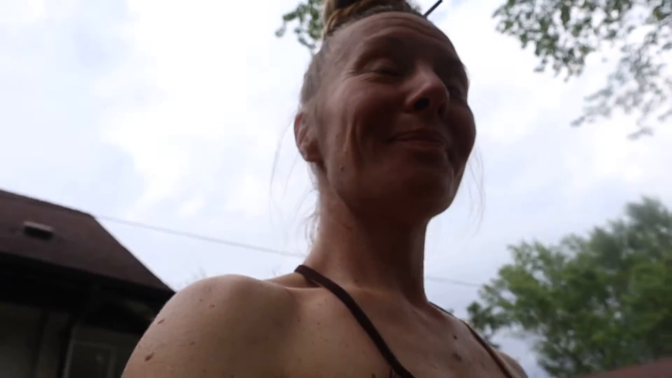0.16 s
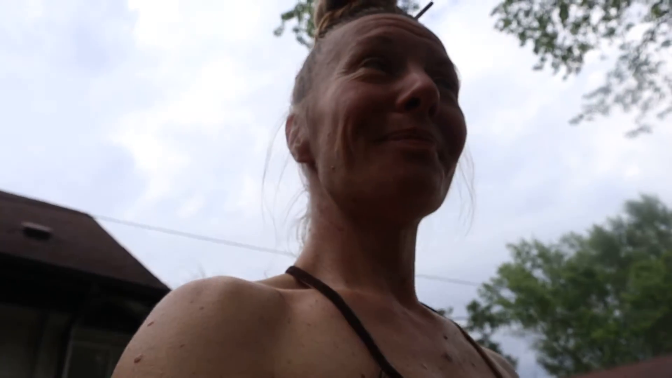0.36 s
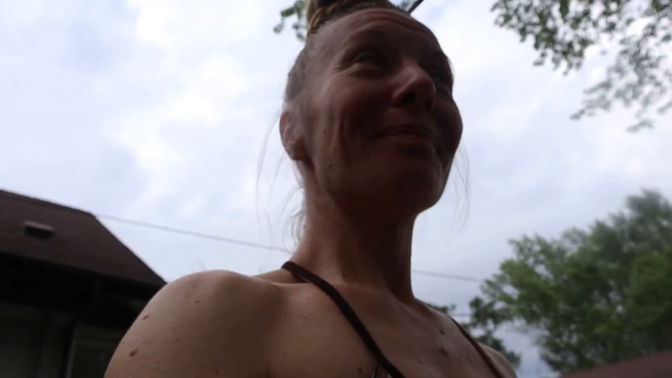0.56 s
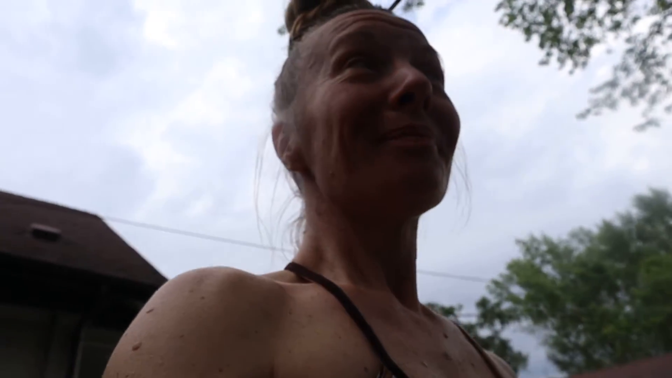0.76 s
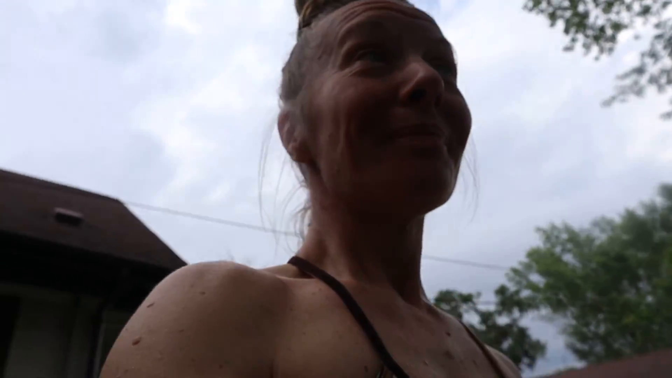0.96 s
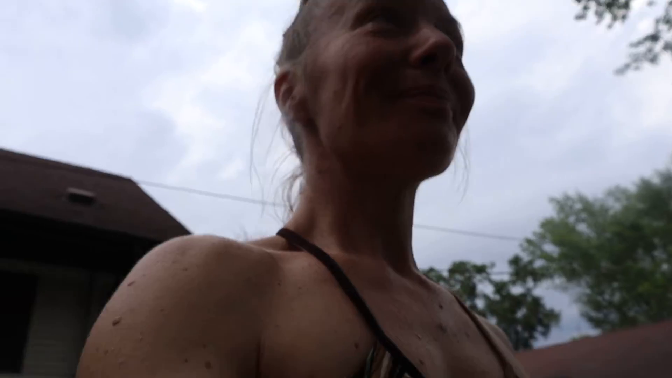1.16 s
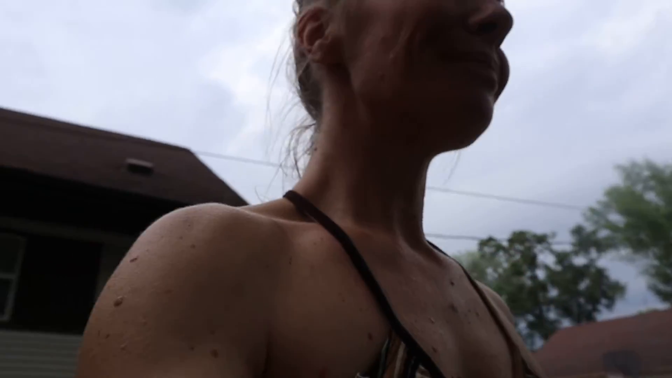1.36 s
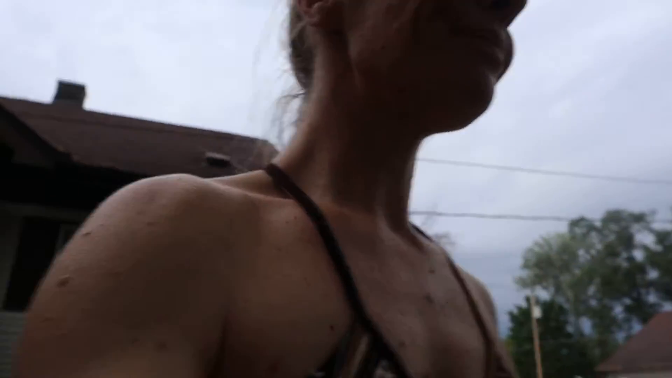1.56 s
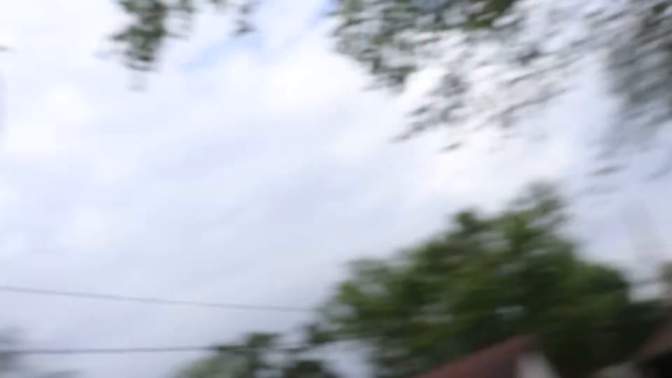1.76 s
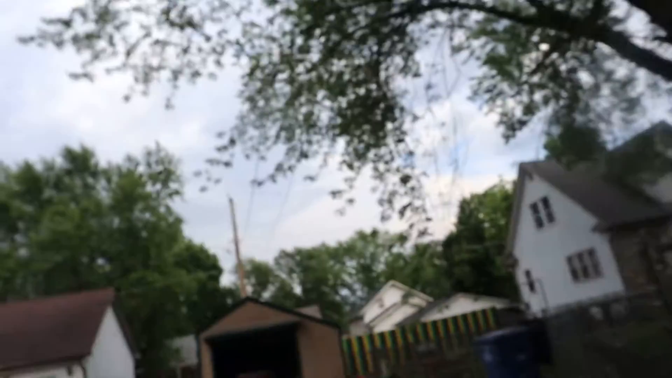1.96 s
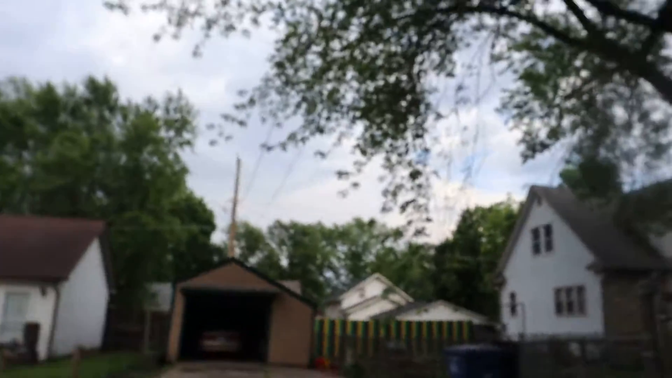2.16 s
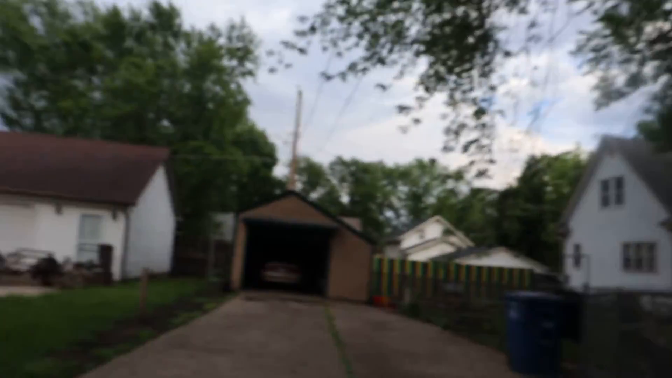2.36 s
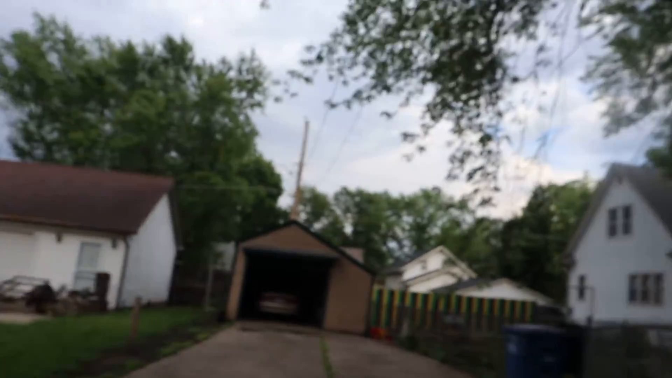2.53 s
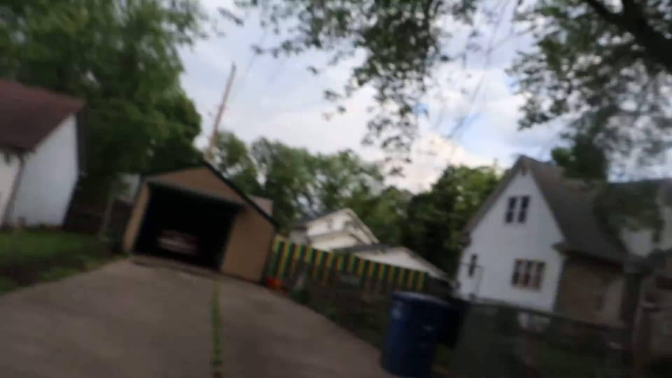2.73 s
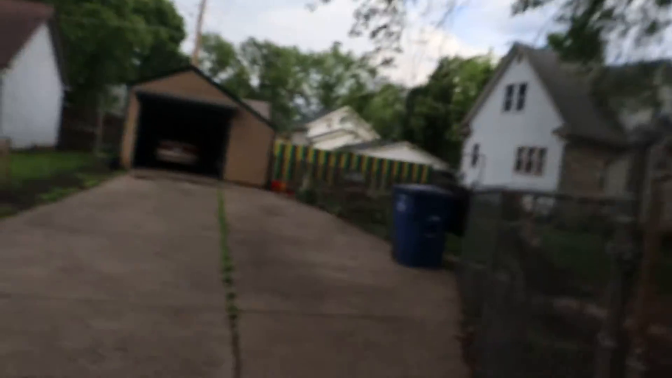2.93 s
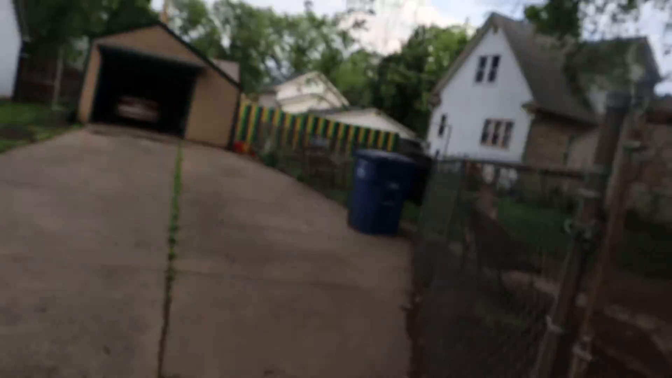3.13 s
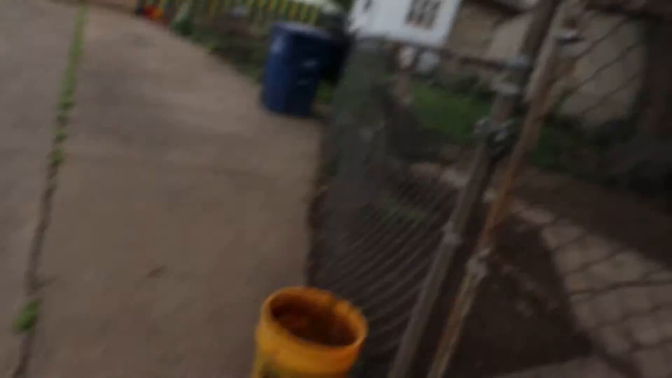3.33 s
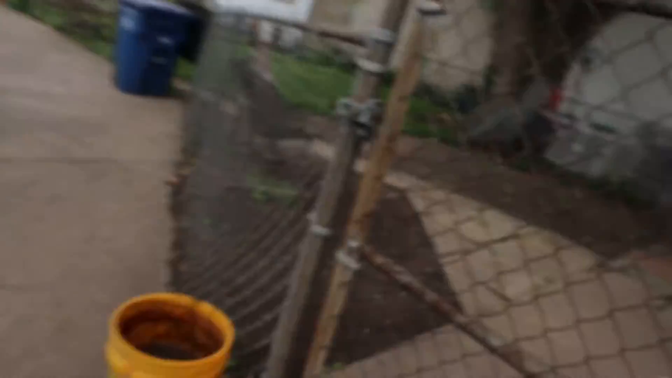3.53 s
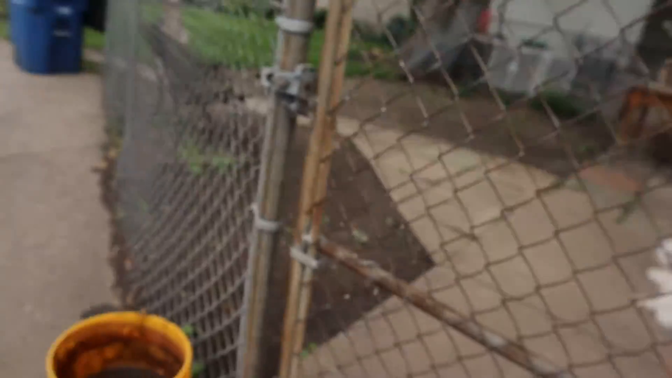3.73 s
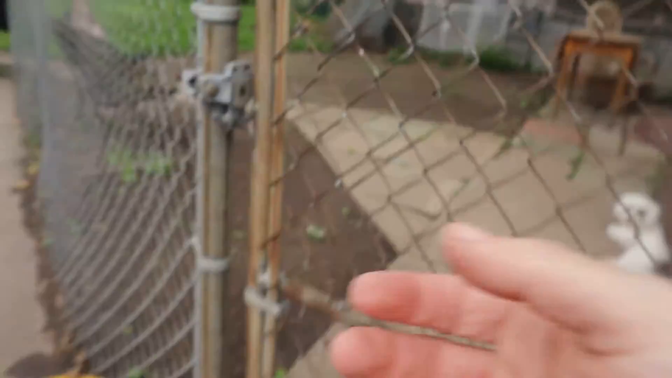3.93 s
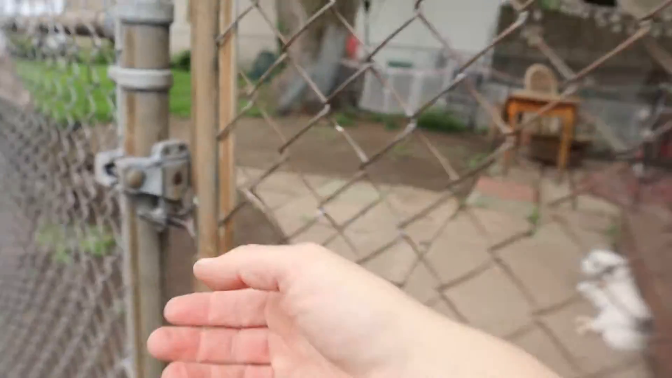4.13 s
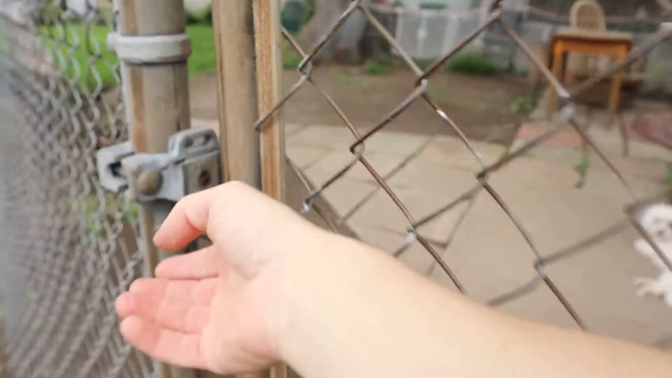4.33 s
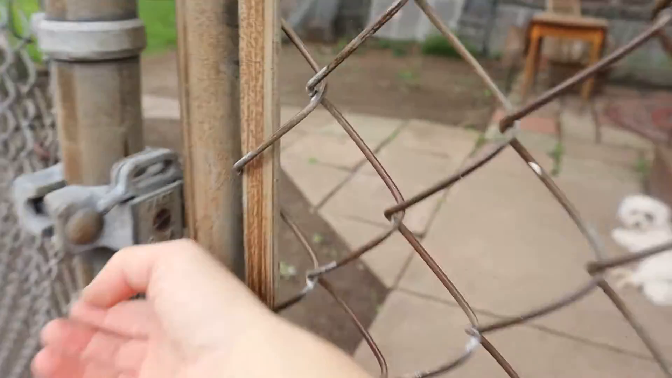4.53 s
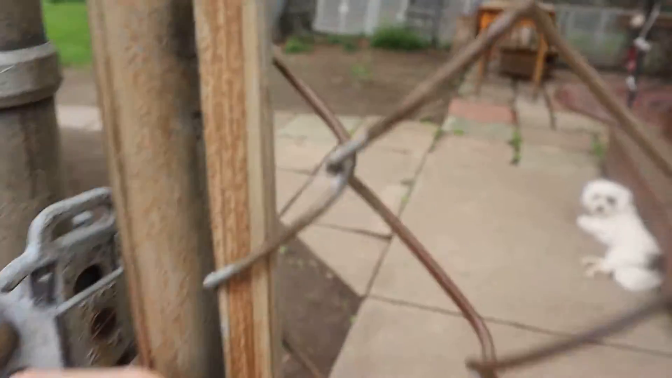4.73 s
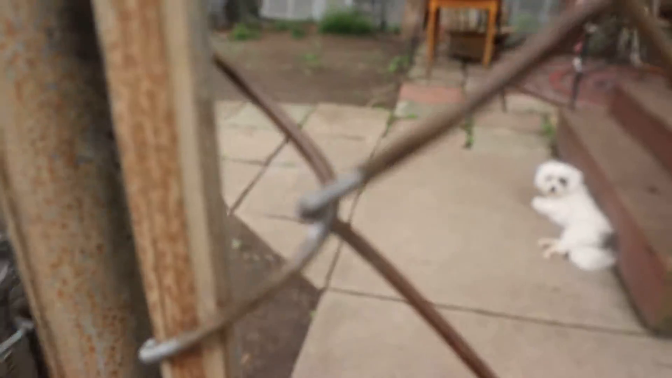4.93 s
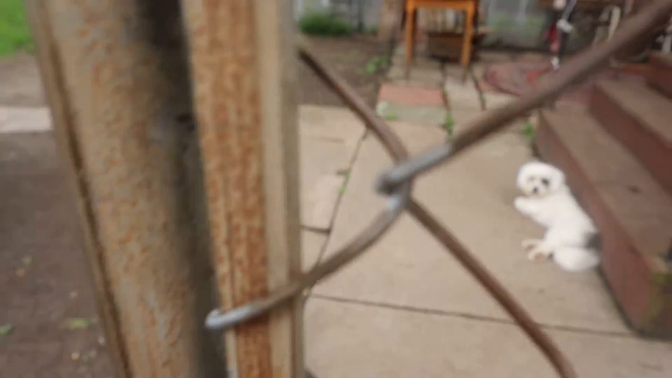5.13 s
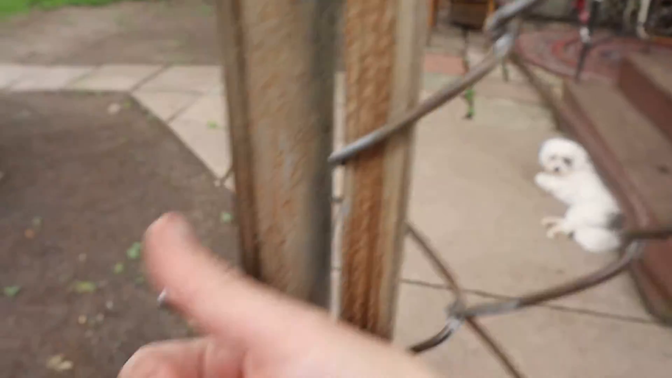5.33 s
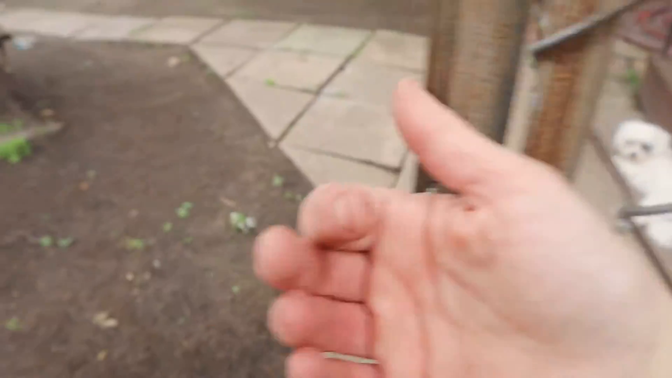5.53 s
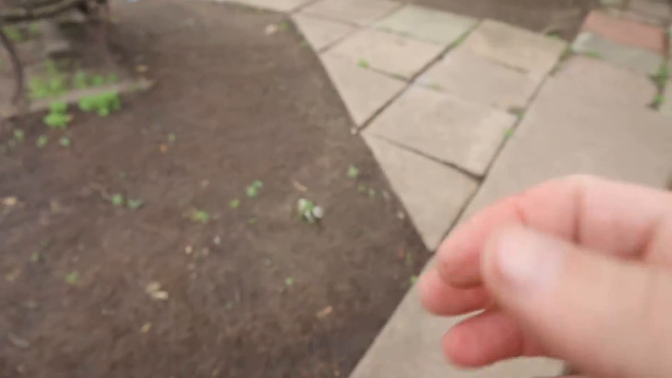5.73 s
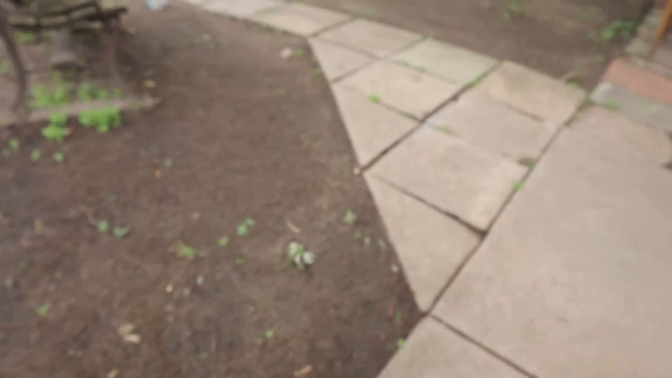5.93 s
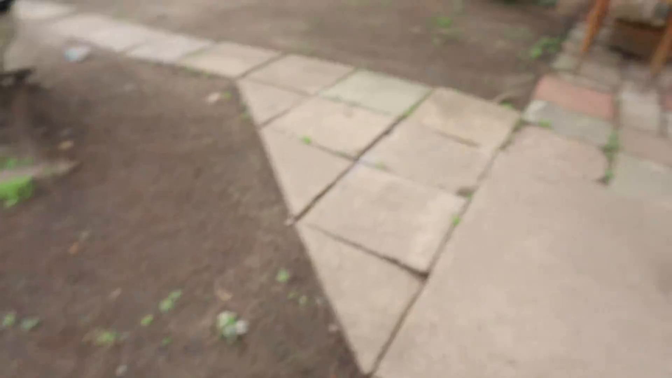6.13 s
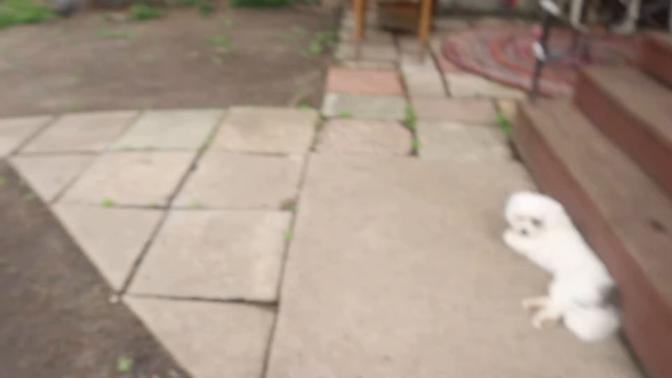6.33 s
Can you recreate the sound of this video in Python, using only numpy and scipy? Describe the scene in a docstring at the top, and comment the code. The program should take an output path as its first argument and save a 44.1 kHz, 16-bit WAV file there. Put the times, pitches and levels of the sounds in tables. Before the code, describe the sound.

Fingers rub and tick on a hand-held microphone, then a chain-link gate's metal latch clacks and rattles, with birds and distant traffic behind.

```python
"""Gate latch in a suburban yard

Close to a hand-held stereo camera, a little left, a chain-link gate's steel fork latch is lifted,
clacks over and drops back, rattling the mesh. Fingers tick, slide and squeak on the housing.
Birds call over distant traffic and leaves, and gusts touch the microphone ports.
The camera pulls its gain down after loud blows and clips their peaks."""
import sys
import numpy as np
from scipy import signal
from scipy.fft import rfft, irfft, next_fast_len
from scipy.io import wavfile
from scipy.ndimage import uniform_filter1d, minimum_filter1d, map_coordinates

SR = 44100
rng = np.random.default_rng(int(sys.argv[2]) if len(sys.argv) > 2 else 0)


def digitize_waveform(pressure):
    """Quantize a signal to 16-bit integers and store it at the path in sys.argv[1].

    Rows of a 2-D input are taken as channels; values are limited to [-1, 1].
    """
    field = np.atleast_2d(pressure).T
    bounded = np.clip(field, -1, 1)
    quanta = np.round(bounded * 32767).astype(np.int16)
    wavfile.write(sys.argv[1], SR, quanta)


N = 285766
T = np.arange(N) / SR

# the yard's background: (time [s], traffic level [dB], leaf level [dB])
BACKGROUND_LEVELS = [(0.0, -34.5, -48.5), (3.52, -34, -44), (6.48, -33.5, -45.5)]
# far traffic and leaves: (frequency [Hz], level [dB])
TRAFFIC_SPECTRUM = [(18, -28), (30, -3.5), (97, -1.5), (158, -5.5), (185, -9), (313, -14), (700, -24.5),
                    (910, -77), (1540, -120)]
LEAF_SPECTRUM = [(290, -14), (500, -18), (742, -2), (1550, -6.5), (2370, -8.5), (3190, -12.5), (10700, -39),
                 (13000, -60)]
# their stereo width: (frequency [Hz], side over mid [dB])
BACKGROUND_WIDTH = [(25, -42), (130, -25), (290, -15), (640, -8), (1410, -5.5), (3100, -2.5), (6820, 5),
                    (15000, 12)]
# a bird's falling double chips: (time [s], length [s], starting pitch [Hz], level [dB])
BIRD_CHIPS = [(0.017, .027, 5070, -54.5), (0.109, 0.015, 4600, -54), (0.159, 0.018, 4700, -56),
              (0.216, .02, 4700, -62), (0.324, 0.016, 4450, -57), (0.824, 0.02, 5700, -60)]
# birds farther off: (time [s], top pitch [Hz], closing pitch over top [ratio], level [dB])
FAR_NOTES = [(0.427, 3950, 0.74, -52), (0.445, 3360, 0.66, -55), (0.572, 3940, 0.85, -51),
             (0.591, 3320, 0.93, -54), (1.655, 4080, 0.71, -51), (1.785, 4050, 0.78, -49),
             (3.576, 3800, 0.69, -47), (3.746, 3890, 0.65, -47), (4.376, 3900, 0.6, -48),
             (4.484, 2660, 0.97, -45.5), (5.53, 3830, 0.85, -47.5), (6.218, 3850, 0.9, -47.5)]
# a near bird with two voices:
# (time [s], low voice level [dB], arching voice against it [dB], pitch [ratio], arch length [s])
NEAR_CALLS = [(1.659, -40.5, -0.5, 0.95, 0.055), (1.857, -39.5, -6, 0.96, 0.071),
              (2.051, -37, -5.5, 1.03, 0.057), (2.262, -38, -7, 0.98, 0.064), (2.493, -39, -6, 0.97, 0.05),
              (5.854, -41, -6.5, .99, .06), (6.066, -38.5, -10.5, 0.98, 0.092), (6.3, -42, -5, 1.01, 0.096)]
# a short peep, a thin whistle and a soft coo: (time [s], length [s], pitches [Hz], level [dB])
BIRD_PEEP = (0, .035, [5050, 5050], -52)
BIRD_WHISTLE = (.47, 0.43, [8750, 9250, 9300, 8700, 7200], -69)
BIRD_COO = (1.72, .36, [345, 347, 343], -46)
# wind on the ports: (time [s], level [dB])
GUST_LEVELS = [(1.45, -63), (1.62, -51), (2.3, -56), (2.9, -53), (3.35, -58), (4.45, -58), (5.9, -62),
               (6.1, -55), (6.48, -61)]
# its low buffeting: (frequency [Hz], level [dB])
GUST_SPECTRUM = [(15, -18), (60, -16), (130, 17.5), (400, -18.5)]
# ticks in the housing: (time [s], level [dB], pitch [Hz], knock against that level [dB])
HOUSING_TICKS = [(1.782, -27.5, 1500, -16), (1.887, -20.5, 1840, -7.5), (1.998, -24.5, 1420, 1.5),
                 (2.598, -23, 6270, -24), (2.626, -21.5, 5230, -20), (2.648, -17.5, 3880, -13),
                 (2.6585, -28, 2300, -3), (3.207, -17.5, 1600, -19), (3.312, -18.5, 1120, -5),
                 (3.38, -21, 1490, -13), (3.813, -17.5, 1610, -0.5), (3.918, -21, 2350, -17),
                 (4.127, -31, 2300, 5), (4.142, -26, 1920, -2), (4.168, -21.5, 1450, -9),
                 (4.307, -21.5, 1180, 4), (4.586, -27.5, 1530, 4.5), (5.895, -29, 1720, -13),
                 (5.802, -29.5, 3500, -13), (6.307, -21, 3280, -3), (6.318, -25, 2480, -12)]
# fingers on the housing: (time [s], length [s], hollow level [dB], rub level [dB], hiss level [dB])
FINGER_SLIDES = [(1.985, 0.074, -54, -51.5, -68), (2.348, 0.16, -47.5, -74, -59.5),
                 (2.654, 0.076, -33, -33, -34), (2.704, 0.13, -39, -51.5, -59),
                 (2.796, 0.11, -36, -42, -48), (2.918, 0.15, -42, -47.5, -46.5),
                 (3.041, 0.061, -36.5, -46.5, -47), (3.098, 0.12, -46, -58, -55),
                 (3.218, 0.12, -44, -48.5, -54.5), (3.358, 0.16, -43.5, -55, -63),
                 (3.482, 0.088, -43.5, -53, -57.5), (3.568, 0.09, -45, -49.5, -57.5),
                 (3.72, 0.095, -44.5, -52, -57), (3.826, 0.14, -45, -51, -54), (4.12, 0.061, -45, -71, -63),
                 (4.58, 0.043, -34, -38, -50), (5.507, 0.078, -62, -57, -62),
                 (5.607, 0.097, -43.5, -52, -63), (5.81, 0.036, -51, -63, -59),
                 (6.17, 0.059, -48.5, -56.5, -75), (6.29, 0.061, -46, -56, -56.5)]
# the housing's hollow resonances: (frequency [Hz], width [Hz], level [dB])
HOUSING_MODES = [(1426, 204, 6.5), (2336, 245, 2.5)]
# the skin's rub and fine hiss: (frequency [Hz], level [dB])
RUB_SPECTRUM = [(1800, -12), (2800, 0), (4300, 0), (6000, -9), (8000, -18.5), (11600, -16.5), (12400, -55)]
SKIN_HISS_SPECTRUM = [(4000, -17), (7500, -11), (10300, -9), (11800, -13), (13000, -22), (15500, -54)]
# stereo width of the slides: (frequency [Hz], side over mid [dB])
SLIDE_WIDTH = [(60, -20), (180, -14), (550, -75), (1650, -6), (4970, 7.5), (15000, 5)]
# a fingertip sticking: (time [s], length [s], pitch [Hz], level [dB])
FINGER_SQUEAKS = [(3.253, 0.014, 1465, -28.5), (3.271, 0.012, 1576, -23.5)]
# steel meeting steel: (time [s], level [dB], most excited frequency [Hz], ring against that level [dB])
LATCH_CONTACTS = [(4.697, -23.5, 2970, -19), (4.7294, -4, 2200, -11), (4.7398, -5.5, 3000, -16.5),
                  (4.7737, -13, 5460, -24), (4.776, -4, 4300, -23), (4.783, -7.5, 2960, -16),
                  (4.789, -11, 3270, -19), (4.8166, 4, 3080, -18), (4.8297, -0.5, 4000, -22),
                  (4.917, -29, 4370, -5), (5.1422, -12, 2620, -18), (5.1976, -26.5, 2100, -5),
                  (5.2032, -15, 2530, -15.5), (5.2219, 6, 5030, -18.5), (5.2425, 2, 2340, -15.5),
                  (5.289, -10, 2210, -17), (5.3356, -11.5, 2780, -20.5), (5.3671, -14, 2770, -20),
                  (5.384, -21, 2500, -29), (5.4256, -23, 2580, -23), (5.4467, -19.5, 2350, -27)]
# modes of fork, pin and post: (frequency [Hz]) and, row for row, (level [dB], t60 [s])
STEEL_MODE_HZ = [1200, 1690, 1790, 1920, 2115, 2360, 2450, 2535, 2907, 3062, 3221, 3265, 3315, 3405, 3570,
                 4356, 4446, 4910, 5166, 5570, 6294, 6560, 7850, 9221, 11161, 14320]
STEEL_MODE_RING = [(-22, .25), (-5.5, 0.24), (-9.5, 0.23), (-4, 0.069), (2, 0.28), (-0.5, 0.13),
                   (-7.5, 0.26), (-8, 0.096), (-11.5, 0.36), (-8, 0.21), (-20, 0.35), (-7.5, 0.11),
                   (-13, 0.19), (-10.5, 0.22), (-25, 0.1), (-9.5, 0.15), (-15.5, 0.18), (-2, 0.16),
                   (-7.5, 0.14), (-3, 0.24), (-26, 0.13), (-9.5, 0.27), (-12, .15), (-2, 0.15), (1.5, 0.36),
                   (-7.5, 0.048)]
# modes of the gate's tube frame: (frequency [Hz], level [dB], t60 [s])
FRAME_MODES = [(136, -4, 0.097), (275, -12, 0.074), (456, -1.5, 0.051), (587, 0.5, 0.071),
               (1025, -1.5, 0.073)]
# the blow itself and the chattering wires: (frequency [Hz], level [dB])
CLANK_SPECTRUM = [(240, -62), (400, -25), (1510, -7.5), (1650, -7), (2120, -9.5), (2710, -11),
                  (4110, -10.5), (5600, -10.5), (8110, -15), (10900, -9), (14800, -38), (16000, -73.5)]
MESH_SPECTRUM = [(470, -70.5), (800, -7), (2160, -1.5), (2990, -2), (6380, -4), (8150, -21), (10700, -12.5),
                 (11600, -23), (13000, -57.5)]
# the gate as it reaches the two ports: (frequency [Hz], left phase lead [rad])
GATE_PHASE_LEAD = [(600, -.2), (1200, -.4), (2800, .2), (4200, 1.4), (8000, 2.1), (12500, 2.3)]


def amp(db):
    """Decibels to amplitude."""
    return 10 ** (np.asarray(db) / 20)


def unit(x):
    """x scaled to an rms of 1."""
    return x / np.sqrt(np.mean(x ** 2) + 1e-20)


def lean_left(db):
    """Stereo gains: left up by db, right down by as much."""
    return amp([[db], [-db]])


def along(points, hz):
    """Reads (frequency, value) points on a log frequency axis."""
    f, v = np.transpose(points)
    return np.interp(np.log(hz + 1), np.log(f + 1), v)


def shaped(spectrum):
    """A spectrum table as gain against frequency."""
    return lambda hz: amp(along(spectrum, hz))


def curves(rows):
    """One value per sample for each column after the time."""
    s, *cols = np.transpose(rows)
    return [np.interp(T, s, c) for c in cols]


def wobble(rate):
    """A smooth random curve, rate knots a second."""
    return map_coordinates(rng.standard_normal(int(N * rate / SR) + 4), [T * rate])


def filtered(x, response):
    """x through a complex frequency response."""
    m = next_fast_len(x.shape[-1] + 8192)
    return irfft(rfft(x, m) * response(np.fft.rfftfreq(m, 1 / SR)), m)[..., :x.shape[-1]]


def stereo_noise(gain, width, grain=1):
    """Left and right noise from a mid of rms 1 and an unrelated side."""
    mid, side = filtered(grain * rng.standard_normal((2, N)),
                         lambda hz: gain(hz) * np.array([np.ones_like(hz), shaped(width)(hz)]))
    return np.array([mid + side, mid - side]) / np.std(mid)


def add(track, s, x):
    """Mixes x into track at s seconds."""
    part = track[..., round(s * SR):][..., :x.shape[-1]]
    part += x[..., :part.shape[-1]]


def note(length, hz, rough=0):
    """A sine whose pitch bends through the given frequencies; a rough one flutters in pitch."""
    u = np.linspace(0, 1, round(length * SR))
    pitch = np.polyval(np.polyfit(np.linspace(0, 1, len(hz)), hz, len(hz) - 1), u)
    flutter = unit(uniform_filter1d(rng.standard_normal(len(u)), size=40))
    phase = 2 * np.pi * np.cumsum(pitch * (1 + 0.12 * rough * flutter)) / SR
    return np.sqrt(2) * np.sin(phase) * np.sin(np.pi * u) ** .5


def traffic_and_leaves():
    """Far traffic rumbles in slow swells under the hiss of leaves; lows reach the left port later."""
    traffic_db, leaf_db = curves(BACKGROUND_LEVELS)
    traffic = amp(traffic_db + 1.4 * wobble(3.2))
    traffic = traffic * stereo_noise(shaped(TRAFFIC_SPECTRUM), BACKGROUND_WIDTH)
    leaves = amp(leaf_db + 1.45 * wobble(5.92)) * stereo_noise(shaped(LEAF_SPECTRUM), BACKGROUND_WIDTH)
    left = lambda f: amp(0.34) * np.exp(-1j * np.pi * f * 8e-5 / (1 + (f / 2500) ** 2))
    return filtered(traffic + leaves, lambda f: np.array([left(f), 1 / left(f)]))


def birds():
    """Birds near and far, a little left, echo off the houses; a peep and a coo sit dry in the centre."""
    song = np.zeros(N)
    fall_hz_per_s, second_chip_s = 58000, 0.012
    for s, low_db, arch_db, pitch, arch_s in NEAR_CALLS:
        low = note(0.037, pitch * np.array([1667, 1845, 1794, 1380]), rough=0.25)
        arch = note(arch_s, pitch * np.array([1890, 2950, 3080, 2470, 1440]), rough=0.364)
        add(song, s, amp(low_db) * low)
        add(song, s - .004, amp(low_db + arch_db) * arch)
    for s, top_hz, close, db in FAR_NOTES:
        add(song, s, amp(db) * note(.06, top_hz * np.array([0.9, 1, close]), rough=0.36))
    for s, length, hz, db in BIRD_CHIPS:
        for start in (s, s + second_chip_s):
            add(song, start, amp(db) * note(length, [hz, hz - fall_hz_per_s * length], rough=0.05))
    s, length, hz, db = BIRD_WHISTLE
    add(song, s, amp(db) * note(length, hz, rough=0.019))
    out = song * lean_left(1.5) + amp(-1.5) * house_walls(song, t60=0.58)
    for s, length, hz, db in (BIRD_PEEP, BIRD_COO):
        add(out, s, amp(db) * note(length, hz))
    return out


def house_walls(x, t60):
    """The houses round the yard answer with a diffuse tail, different in each port."""
    t = np.arange(SR // 4) / SR
    tail = rng.standard_normal((2, len(t))) * amp(-60 * t / t60) * (t > .012)
    return signal.fftconvolve(x[None], tail / np.linalg.norm(tail[0]), axes=1)[:, :N]


def gusts():
    """Wind right on the microphone pushes the two ports against each other in low lumps."""
    strength = amp(curves(GUST_LEVELS)[0] + 4.9 * wobble(12))
    buffet = strength * unit(filtered(rng.standard_normal(N), shaped(GUST_SPECTRUM)))
    return np.array([buffet, -buffet])


def housing_ticks():
    """A small slip on the camera body: a swing gone in a few cycles, a dull knock and a little crack."""
    out, t = np.zeros((2, N)), np.arange(SR // 20) / SR
    knock_hz, crack_edge_hz = 500, 5500
    for s, db, hz, knock_db in HOUSING_TICKS:
        swing = np.sin(2 * np.pi * hz * t) * amp(-60 * t * hz / 13) * (1 - np.exp(-t / 0.000093))
        knock = np.sin(2 * np.pi * knock_hz * t) * amp(knock_db - 60 * t / 0.0086)
        crack = filtered(rng.standard_normal((2, len(t))), lambda f: 1 / (1 + 1j * f / crack_edge_hz) ** 4)
        crack *= amp(knock_db - 8 - 60 * t / 0.022)
        add(out, s, amp(db) * ((swing + knock) * lean_left(1.5) + crack))
    return out


def housing_response(f):
    """The hollow camera body resonates in two modes of opposite sign."""
    return sum((-1) ** k * amp(db) * 1j * f * width / (hz * hz - f * f + 1j * f * width)
               for k, (hz, width, db) in enumerate(HOUSING_MODES))


def finger_slides():
    """Beside the microphone, skin sticks and slips in grains; each slide starts fast and trails off."""
    push = np.zeros((3, N))
    rise, hold = 0.049, 0.74  # shares of a slide's length
    for s, length, *db in FINGER_SLIDES:
        t = np.arange(round((length + .1) * SR)) / SR
        fade = amp(-86 * np.maximum(t / length - hold, 0) ** 2)
        add(push, s, amp(db)[:, None] * (1 - np.exp(-t / (rise * length))) * fade)
    push *= amp([1.9 * wobble(35) + 1.2 * wobble(13) for layer in push])  # uneven pressure
    grit = lambda rate: amp(2.1 * amp(2.4 * wobble(9.9)) * wobble(rate))  # its depth comes and goes
    hollow = lean_left(.8) * stereo_noise(housing_response, SLIDE_WIDTH, amp(1.64 * wobble(250)))
    rub = stereo_noise(shaped(RUB_SPECTRUM), SLIDE_WIDTH, grit(rate=480))
    hiss = stereo_noise(shaped(SKIN_HISS_SPECTRUM), SLIDE_WIDTH, grit(rate=540))
    return push[0] * hollow + push[1] * rub + push[2] * hiss


def finger_squeaks():
    """A fingertip sticks and the housing sings briefly near its hollow resonance."""
    out = np.zeros(N)
    for s, length, hz, db in FINGER_SQUEAKS:
        add(out, s, amp(db) * note(length, [hz, hz], rough=0.42))
    return out * lean_left(1.2)


def steel_ring(t, excitation, held):
    """Fork, pin and post ring at new strengths each blow; each mode beats with a weaker, higher twin."""
    hz = np.array(STEEL_MODE_HZ)[:, None]
    db, t60 = np.transpose(STEEL_MODE_RING)[..., None]
    grip_db_per_s = (120 + 0.038 * hz) * held  # a gripping hand damps the high modes most
    strength = amp(db + 1.5 * rng.standard_normal(hz.shape)) * excitation(hz)
    twin = 0.5 * np.sin(2 * np.pi * hz * 1.0012 * t) * rng.choice([-1, 1], size=hz.shape)
    pair = np.sin(2 * np.pi * hz * t) + twin
    return np.sum(strength * amp(-(60 / t60 + grip_db_per_s) * t) * pair, 0)


def frame_clunk(t, held):
    """The tube frame clunks dully, driven harder while the hand pushes."""
    drive_db = -31 if held else -45
    return sum(amp(drive_db + db + 4 * rng.standard_normal() - 60 * t / t60) * np.sin(2 * np.pi * hz * t)
               for hz, db, t60 in FRAME_MODES)


def clank_and_mesh(t, excitation):
    """The blow's short clank and the wires' longer chatter: noise gathered near the steel's modes."""
    hz = np.array(STEEL_MODE_HZ)[:, None]
    mode_peaks = lambda f: 1 + 2.5 * np.sum(1 / (1 + ((f - hz) / 25) ** 2), 0)
    blow, wires = filtered(rng.standard_normal((2, len(t))), mode_peaks)
    clank = unit(filtered(blow, lambda f: shaped(CLANK_SPECTRUM)(f) * excitation(f)))
    clank *= amp(-60 * t / 0.045) + 1.8 * amp(-60 * t / 0.003)
    mesh = unit(filtered(wires, lambda f: shaped(MESH_SPECTRUM)(f) * excitation(f) ** .5))
    mesh *= amp(-60 * t / 0.37) * (1 - np.exp(-t / 0.0029))
    return amp(-11) * clank + amp(-21.5) * mesh


def gate_latch():
    """Each contact sounds steel, frame and mesh; the gate is left, its treble out of step at the ports."""
    gate, t = np.zeros(N), np.arange(SR * 6 // 10) / SR
    let_go_s = 5.21  # the hand leaves the latch
    for s, db, centre_hz, ring_db in LATCH_CONTACTS:
        focus = 1.2 + .4 * max(4 - db, 0)  # a light touch excites a narrow range, a hard blow a wide one
        excitation = lambda f: amp(-focus * np.log2((f + 50) / centre_hz) ** 2)
        held = s < let_go_s
        ring = amp(ring_db) * steel_ring(t, excitation, held)
        contact = ring + frame_clunk(t, held) + clank_and_mesh(t, excitation)
        add(gate, s, amp(db) * contact * (1 - np.exp(-t / 0.00027)))
    left = lambda f: amp(2.0) * np.exp(.5j * along(GATE_PHASE_LEAD, f))
    side = filtered(gate, lambda f: (left(f) - 1 / left(f)) / (left(f) + 1 / left(f)))
    return np.array([gate + side, gate - side]) + amp(-14) * house_walls(gate, t60=0.15)


def scene():
    """The yard at the two microphone ports, before the camera's gain control."""
    close = gate_latch() + finger_slides() + housing_ticks() + finger_squeaks()
    return close + birds() + traffic_and_leaves() + gusts()


def record(dry):
    """The camera ducks loud blows a moment late, recovers steadily, clips and cuts the top treble."""
    hold, lag = round(0.037 * SR), round(0.014 * SR)
    release_db_per_s, top_hz, edge_hz = 150, 15900, 250
    level = 1.9 * np.sqrt(np.abs(uniform_filter1d(dry ** 2, size=130)).max(0))
    peak = -minimum_filter1d(-level, hold, origin=(hold - 1) // 2)
    cut_db = 1.58 * np.maximum(20 * np.log10(peak + 1e-9) + 1.0, 0)
    release_db = release_db_per_s * T
    cut_db = np.maximum.accumulate(cut_db + release_db) - release_db
    gain = amp(-uniform_filter1d(cut_db, lag, origin=(lag - 1) // 2))
    clipped = np.clip(dry * gain, -.95, .95)
    return filtered(clipped, lambda hz: np.clip((top_hz - hz) / edge_hz, 0, 1) ** 2)


dry = scene()
out = record(dry)
digitize_waveform(out)
```